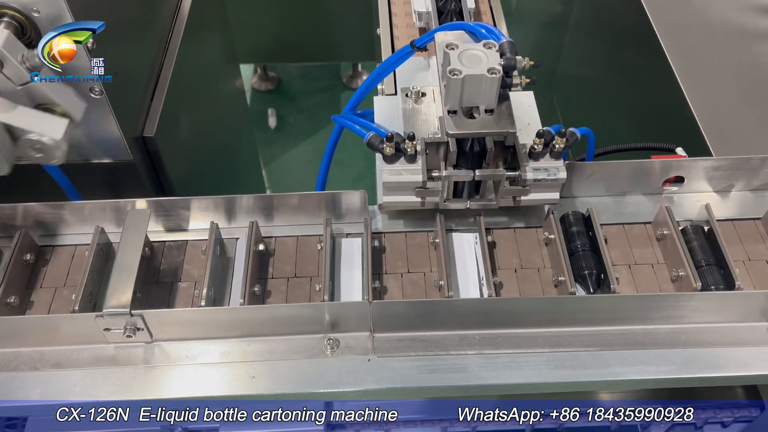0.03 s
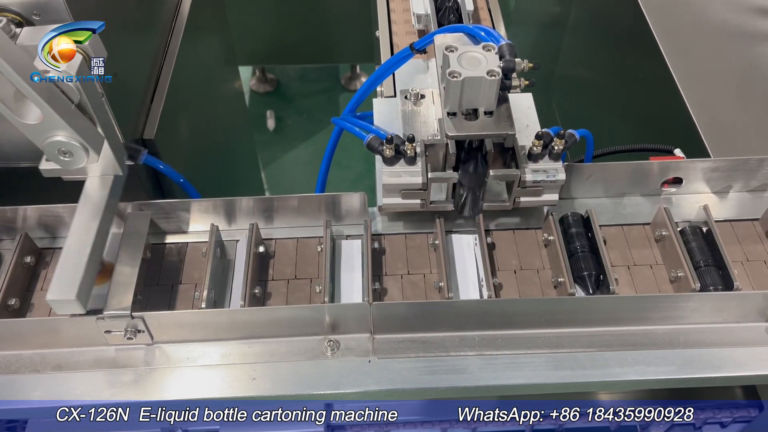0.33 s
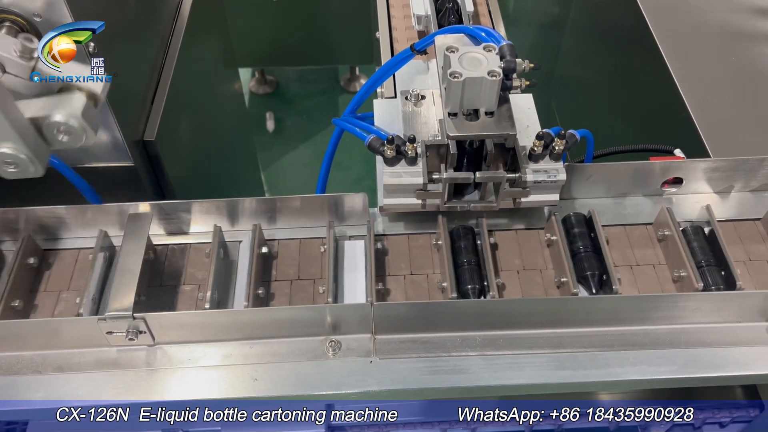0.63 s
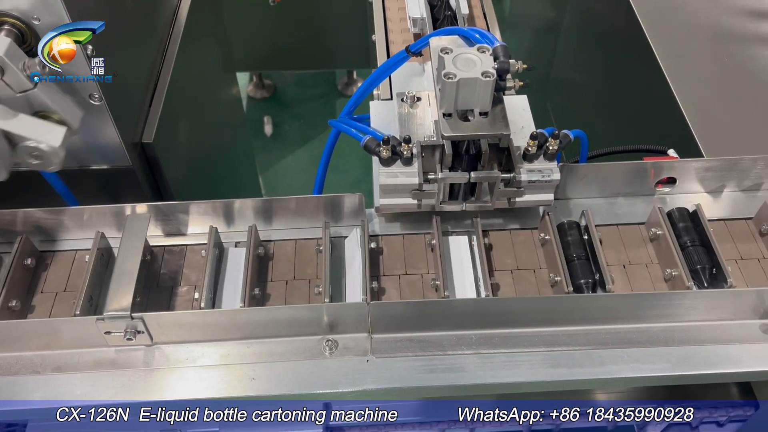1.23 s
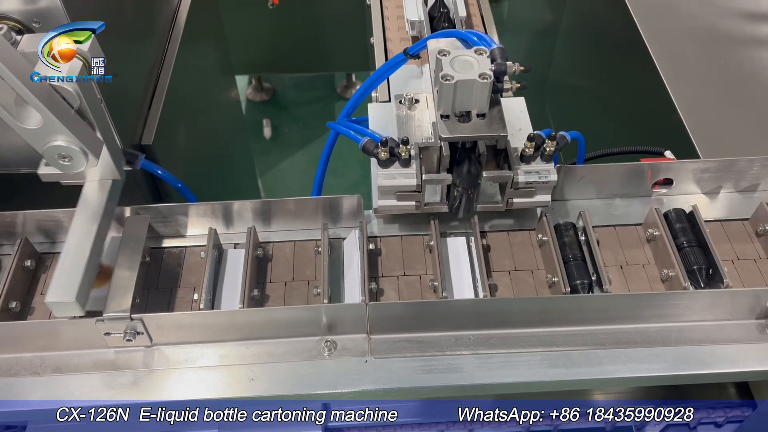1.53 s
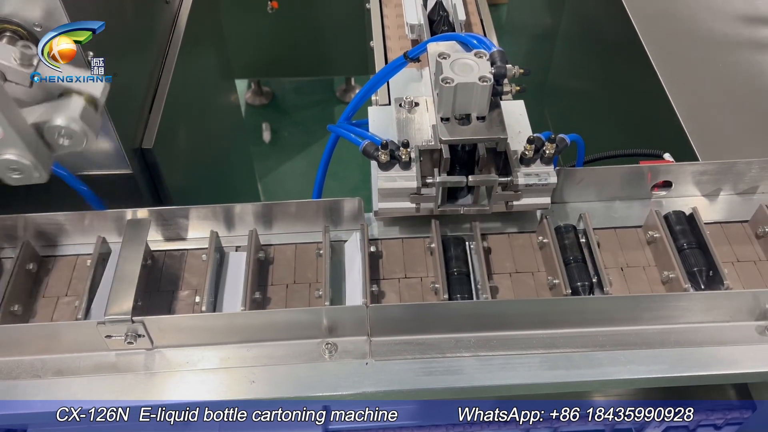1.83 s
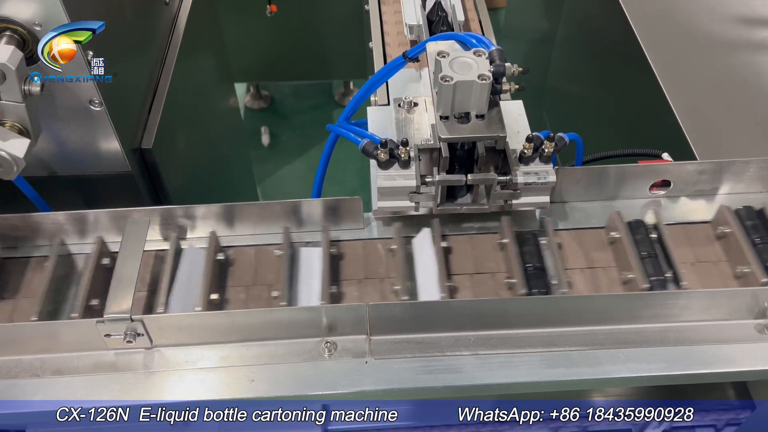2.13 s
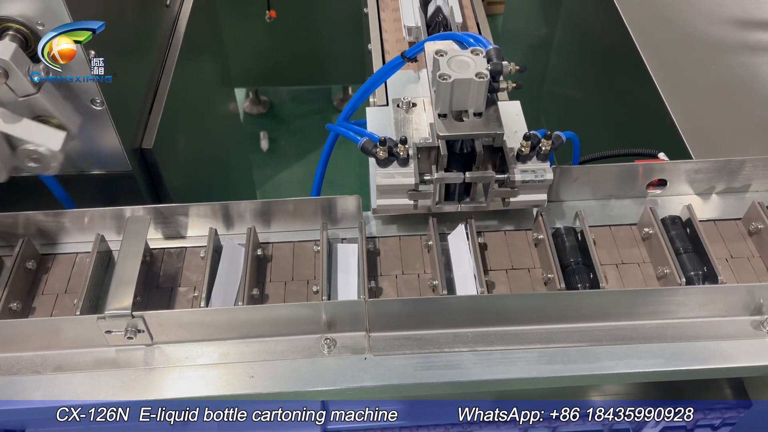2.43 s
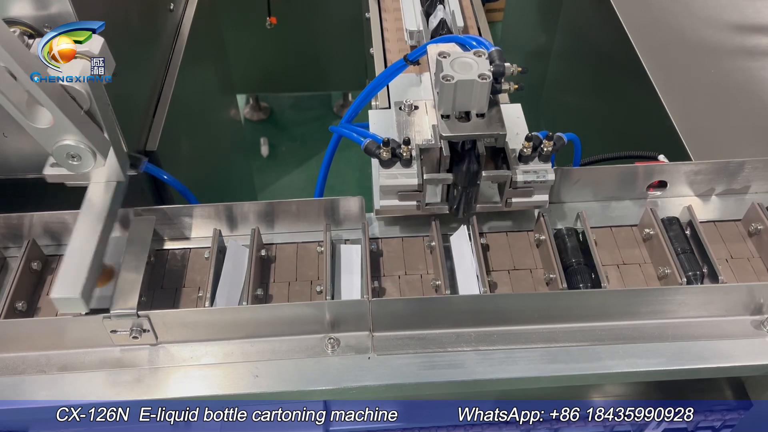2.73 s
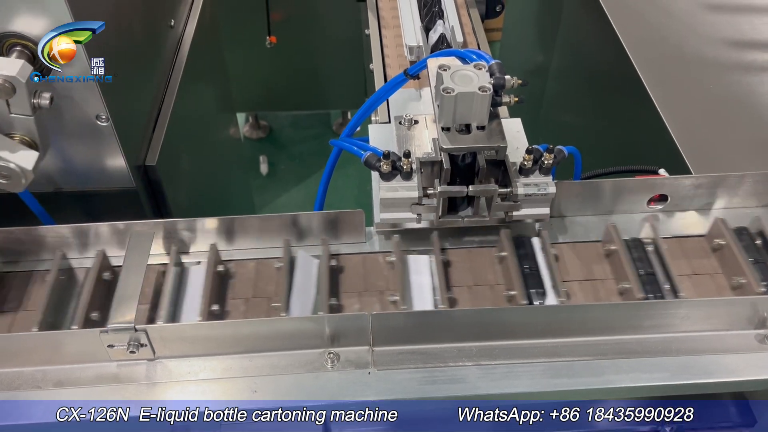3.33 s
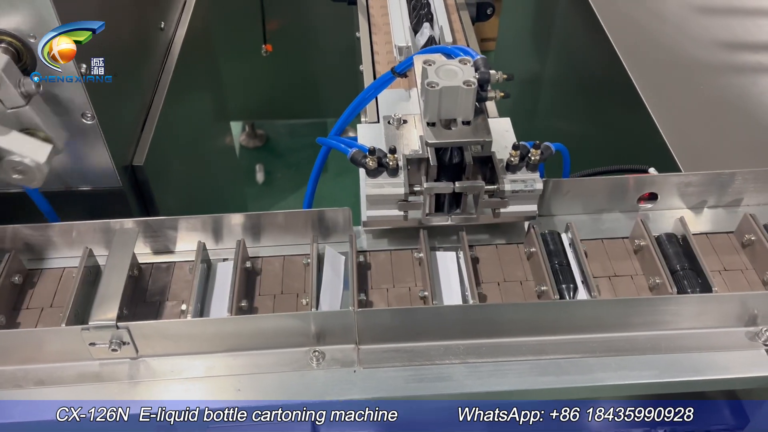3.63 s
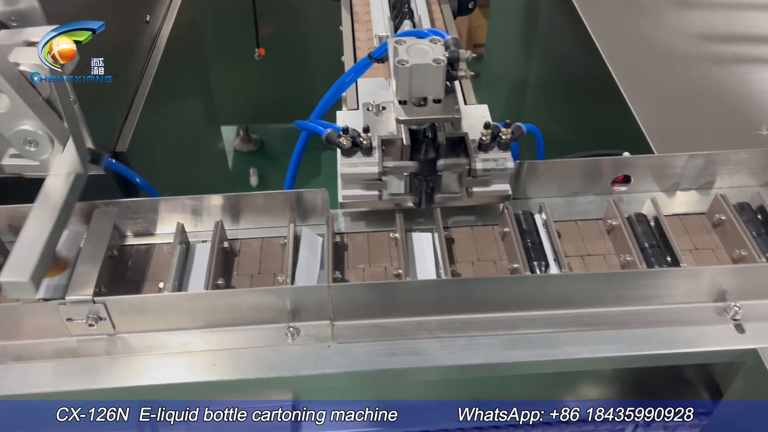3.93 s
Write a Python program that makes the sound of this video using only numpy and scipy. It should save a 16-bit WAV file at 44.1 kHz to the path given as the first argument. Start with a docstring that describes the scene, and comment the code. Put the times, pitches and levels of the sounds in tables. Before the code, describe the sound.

An automatic packaging machine cycles steadily in a factory hall. Its arm knocks on sheet steel, a gripper snaps, valves puff air, and a chain conveyor slides and thumps to a stop. Near the end the chain briefly judders.

```python
"""A cartoning machine runs in a factory hall, one cycle about every 1.2 seconds.
Its arm knocks cartons into place and rings the sheet steel, a gripper snaps, and valves puff air.
The chain slides on one pocket and stops with a thump; cartons rub along the guides.
Near the end a bottle catches and the chain judders. Drives rumble and hum underneath."""
import sys
import numpy as np
from scipy import signal
from scipy.fft import rfft, irfft
from scipy.io import wavfile

SR = 44100
rng = np.random.default_rng(int(sys.argv[2]) if len(sys.argv) > 2 else 0)


def generate_wav(sig):
    """Save sig (samples, or channels by samples) to the path in sys.argv[1] as 16-bit PCM at SR."""
    pcm = np.round(np.clip(np.atleast_2d(sig).T, -1, 1) * 32767).astype(np.int16)
    wavfile.write(sys.argv[1], SR, pcm)


N = 176400
T = np.arange(N) / SR
CYCLE_S = 1.209


def arm():
    """The arm and pushers knock on sheet steel: a hollow clatter, a ring and a deep panel boom."""
    # Each row: start in seconds, clatter, ring and boom in dB, rise and fade in seconds.
    knocks = [(0.319, -22, -31, -18.5, 0.002, 0.13), (0.334, -27, -38, -25, 0.0025, .09),
              (0.583, -26, -31, -36, 0.0095, 0.1), (0.612, -18, -24.5, -21, 0.00075, 0.048),
              (1.153, -25, -40, -32, .003, 0.12), (1.527, -26, -30, -31, 0.0027, 0.06),
              (1.544, -29, -29.5, -24.5, 0.0028, 0.12), (1.787, -24.5, -30.5, -37, 0.0032, 0.17),
              (1.821, -16, -23.5, -21.5, 0.0014, 0.018), (2.362, -32, -43, -26.5, 0.0065, 0.077),
              (2.738, -17, -23.5, -15, 0.00487, 0.044), (2.755, -34, -35, -23, 0.0019, 0.05),
              (3.031, -25, -29, -24, 0.0018, 0.13), (3.576, -25.5, -34.5, -24.5, 0.0039, 0.12),
              (3.946, -27, -41, -33, 0.0026, 0.12), (3.963, -25, -32, -21, 0.0029, 0.079)]
    # Each row is one ringing tone: pitch in Hz, level in dB, fade in seconds.
    steel_modes = [(980, -13, 0.03), (1060, -6, 0.047), (1273, -4.5, 0.05), (1338, -2, 0.07),
                   (1525, -10, 0.062), (1804, -6.5, 0.058), (2090, -3, 0.035), (2480, -15, 0.043)]
    panel_modes = [(260, -5.5, 0.16), (471, -2.5, 0.098), (544, -9, 0.08), (696, 0, 0.042),
                   (758, -7.5, 0.058)]
    # The clatter's tone. Each row: frequency in Hz, level in dB.
    colour = [(100, -28), (250, 11.5), (480, 0.5), (720, -10), (1000, 6.5), (1400, -3), (2400, -11.5),
              (4000, -11.5), (8000, -54)]
    clatter = sum(from_db(db) * envelope(s, rise, t60) for s, db, _, _, rise, t60 in knocks)
    contacts = bouncing([(s, db) for s, _, db, _, _, _ in knocks], gap_s=0.0046, loss_db=3, count=3)
    boom = struck([(s + rise, db) for s, _, _, db, rise, _ in knocks], panel_modes, spread_db=1)
    return clatter * noise(colour, flicker_db=3.5) + struck(contacts, steel_modes, spread_db=5) + boom


def clicks():
    """The gripper snaps, the arm's tip taps a carton, end stops tick: each clacks and briefly rings."""
    # Each row: start in seconds, clack, bright edge and ring in dB, fade in seconds.
    snaps = [(0.5156, -13, -28, -20, 0.012), (0.5192, -10.5, -17, -25, 0.016),
             (1.7266, -11.5, -11.5, -12.5, 0.015), (2.9411, -17, -9.5, -10, 0.011)]
    taps = [(0.3145, -26, -34, -17, 0.011), (1.5239, -8.5, -11, -15, 0.0079), (1.8215, -24, -34, -23, .02),
            (2.7342, -9, -30, -15.5, .008), (3.9448, -21, -7, -11.5, 0.012)]
    ticks = [(1.1468, -25, -10, -33, 0.0065), (2.3625, -20, -12.5, -26, 0.012),
             (2.4420, -14, -20, -36, 0.021), (3.0732, -14, -24, -17, 0.013),
             (3.6622, -15.5, -31, -18.5, 0.021)]
    # How each part rings. Each row: pitch in Hz, level in dB, fade in seconds.
    gripper_modes = [(930, -5.5, 0.015), (2000, -15.5, 0.024), (3290, 1.5, 0.015), (4840, -6, 0.018),
                     (11100, -6, 0.0055)]
    arm_modes = [(2220, -5.5, 0.016), (2400, -2, 0.013), (3020, -10.5, 0.0054), (4880, -5, 0.012)]
    stop_modes = [(5320, 1, 0.016)]
    # Each row: frequency in Hz, level in dB.
    clack_colour = [(300, -6), (900, 3), (2200, 6.5), (3400, 5), (5000, 3), (7000, -1), (10000, -17),
                    (16000, 3.5)]
    edge_colour = [(4000, -0.5), (8000, -4), (10000, 1.5), (12000, 7), (15000, 3), (16500, -13)]
    clack = edge = ring = 0
    for hits, modes in (snaps, gripper_modes), (taps, arm_modes), (ticks, stop_modes):
        ring += struck([(s, db) for s, _, _, db, _ in hits], modes, spread_db=3.5)
        for s, clack_db, edge_db, _, t60 in hits:
            burst = envelope(s, 0.00014, t60)
            clack += from_db(clack_db) * burst
            edge += from_db(edge_db) * burst
    return clack * noise(clack_colour, flicker_db=.5) + edge * noise(edge_colour, flicker_db=.5) + ring


def frame():
    """Each start or stop swings the frame at a low pitch and sets its panels rumbling."""
    # Each row: seconds into the cycle, swing in dB, pitch in Hz, rumble in dB, rise and fade in seconds.
    thumps = [(0.289, -17.5, 233, -27.5, 0.0035, 0.066), (0.322, -32.5, 283.5, -27, 0.019, 0.49),
              (0.61, -36, 285, -27.5, 0.0026, 0.28), (0.925, -17, 92, -23.5, .013, 0.15),
              (1.113, -19.5, 143.8, -24, 0.0037, 0.1), (0.02, -38, 80, -25, 0.011, 0.26)]
    # The rumble's tone. Each row: frequency in Hz, level in dB.
    colour = [(30, -29), (60, 4.5), (110, -4.5), (190, -7.5), (280, 1), (400, -8.5), (700, -11.5),
              (2000, -38)]
    swing = rumble = 0
    for s, swing_db, hz, rumble_db, rise, t60 in thumps:
        for start in every_cycle(s):
            jolt = envelope(start, rise, t60)
            swing += from_db(swing_db) * jolt * np.sin(2 * np.pi * hz * (T - start))
            rumble += from_db(rumble_db) * jolt
    return swing + rumble * noise(colour, flicker_db=1.5)


def valves(open_s=.3):
    """Escaping air hisses over a lower rush and whistles at the nozzle until the valve shuts."""
    # Each row: seconds into the cycle, hiss, rush and whistle in dB, rise, hold and fade in seconds.
    puffs = [(0.008, -31, -34.5, -33.5, .025, 0.013, 2.1), (0.284, -24.5, -25, -37, 0.017, 0.017, 0.28),
             (0.325, -33, -35, -39.5, 0.034, 0.031, 2.2), (1.091, -27, -33, -49, 0.029, 0.032, 0.18)]
    # Each row: frequency in Hz, level in dB.
    hiss_colour = [(3000, -30), (6000, -8), (7300, -0.5), (8100, 0), (9300, 1.5), (10900, -6.5),
                   (12300, 2.5), (13600, -0.5), (15600, -3.5)]
    rush_colour = [(300, 7), (900, -1), (1800, 1.5), (3000, 6.5), (4500, 3.5), (6000, 5), (8000, -2),
                   (12000, -8)]
    whistle_colour = [(9000, -25), (10300, -7), (10950, -3.5), (11500, -8), (12200, -22)]
    hiss = rush = whistle = 0
    for s, hiss_db, rush_db, whistle_db, rise, hold, t60 in puffs:
        flow = sum(envelope(start, rise, t60, hold) * (T < start + open_s) for start in every_cycle(s))
        hiss = np.hypot(hiss, from_db(hiss_db) * flow)  # overlapping puffs add in power
        rush = np.hypot(rush, from_db(rush_db) * flow)
        whistle += from_db(whistle_db) * flow
    return (hiss * noise(hiss_colour, flicker_db=1.1)
            + whistle * noise(whistle_colour, flicker_db=2)
            + panned(rush * noise(rush_colour, flicker_db=2.15), left_db=1.5))


def chain(hiss_boost_db=3.5, scrape_boost_db=1, ticks_per_s=250, tick_db=-8.5):
    """The chain hisses and scrapes along its guides while the links tick."""
    # One list per advance. Each row: time in seconds, hiss and scrape in dB before their boosts.
    slides = [
        [(0.56, -51, -47), (0.566, -52, -51), (0.58, -33.5, -29), (0.704, -29, -33), (0.77, -33, -29.5),
         (0.808, -45, -55), (0.826, -32.5, -35), (0.872, -51, -53), (0.916, -45, -47), (0.948, -32, -32.5),
         (1.06, -34.5, -32.5), (1.09, -52, -37)],
        [(1.77, -37, -54), (1.82, -30, -27.5), (1.844, -31, -33), (1.87, -28.5, -32), (2.084, -28, -32.5),
         (2.134, -31, -35), (2.152, -28.5, -30), (2.19, -40, -58), (2.196, -52, -59), (2.25, -37.5, -48),
         (2.286, -36, -52), (2.3, -52, -40)],
        [(2.98, -48, -50), (2.994, -50, -39), (3.012, -31, -26.5), (3.026, -36, -29), (3.042, -39, -30),
         (3.062, -34, -31), (3.08, -33, -23.5), (3.114, -32, -30.5), (3.312, -30.5, -34), (3.43, -33.5, -34.5),
         (3.51, -35, -55)],
    ]
    # Each row: frequency in Hz, level in dB.
    hiss_colour = [(3000, -33), (6000, -10), (7300, -3.5), (8100, -13), (9300, -1.5), (10900, -3.5),
                   (12300, -1.5), (13600, -0.5), (15600, -3)]
    scrape_colour = [(400, 7.5), (1000, -5), (1800, -0.5), (2700, 0), (3900, 2), (5200, -4), (7200, -6.5),
                     (12000, -44)]
    hiss_level = scrape_level = 0
    for advance in slides:
        s, hiss_db, scrape_db = np.transpose(advance)
        hiss_level += np.interp(T, s, from_db(hiss_db + hiss_boost_db), 0, 0)
        scrape_level += np.interp(T, s, from_db(scrape_db + scrape_boost_db), 0, 0)
    ticks = (rng.random(N) < ticks_per_s / SR) * rng.standard_normal((2, N))
    hiss = noise(hiss_colour, flicker_db=1.5)
    scrape = noise(scrape_colour, flicker_db=2) + from_db(tick_db) * coloured(ticks, scrape_colour)
    return hiss_level * hiss + panned(scrape_level * scrape, left_db=1.5)


def rattle():
    """As the chain halts, its slack links jangle against each other."""
    # Each row: start in seconds, level in dB.
    halts = [(0.9505, -23.5), (2.152, -37), (3.3605, -23.5)]
    # How the links ring. Each row: pitch in Hz, level in dB, fade in seconds.
    link_modes = [(2820, -11, 0.011), (3650, 3.5, 0.014), (4180, -3, 0.0088), (4930, -4, .01)]
    return struck(bouncing(halts, gap_s=.003, loss_db=2.8, count=8), link_modes, spread_db=3.5)


def bottle(rise=0.00069, t60=0.012):
    """A bottle catches in its pocket with short gritty scuffs."""
    # Each row: start in seconds, level in dB, hold in seconds.
    scuffs = [(3.006, -16.5, .0035), (3.028, -13.5, .0022), (3.067, -17, .001), (3.0706, -13.5, 0.0038)]
    # The scuffs' tone. Each row: frequency in Hz, level in dB.
    colour = [(400, -4), (1200, 0), (3000, -3), (4600, 0.5), (6200, 1.5), (8000, 3), (10000, 2),
              (13000, -7), (16000, -2)]
    level = sum(from_db(db) * envelope(s, rise, t60, hold) for s, db, hold in scuffs)
    return panned(level * noise(colour, flicker_db=1), left_db=-1.3)


def judder(start=3.07, rise=0.018, hold=0.49, t60=0.66, db=-31):
    """After the bottle has caught, the chain runs roughly for one advance."""
    # A low growl. Each row: frequency in Hz, level in dB.
    colour = [(80, -23), (160, -2), (300, 3.5), (420, -6.5), (900, -24)]
    return from_db(db) * envelope(start, rise, t60, hold) * noise(colour, flicker_db=4.5)


def guard(at_s=1.155, db=-27, hz=1335, t60=0.13):
    """Once a cycle the returning pusher sets a thin guard plate ringing."""
    return struck([(start, db) for start in every_cycle(at_s)], [(hz, 0, t60)], spread_db=1)


def cartons(patchy_db=3):
    """Cartons grip and slip on the guides; each rub swells and fades around one pitch."""
    # Each row: start and length in seconds, pitch and band width in Hz, level in dB.
    rubs = [(0.733, 0.042, 2700, 180, -36), (0.745, .04, 3800, 400, -35), (0.938, 0.042, 4040, 300, -34),
            (1.91, 0.15, 2600, 160, -42), (1.058, 0.14, 2830, 330, -38), (1.277, 0.2, 2930, 380, -37.5),
            (1.73, 0.4, 2910, 252, -39), (1.854, 0.15, 3880, 260, -37), (2.04, 0.14, 11700, 300, -34),
            (3.077, 0.32, 11950, 447, -36)]
    out = 0
    for s, length, hz, width_hz, db in rubs:
        band = signal.butter(2, [hz - width_hz / 2, hz + width_hz / 2], "band", fs=SR, output="sos")
        progress = np.clip((T - s) / length, 0, 1)
        swell = np.sqrt(np.abs(np.sin(np.pi * progress)))
        out += from_db(db) * swell * rms_one(signal.sosfilt(band, rng.standard_normal(N)))
    return out * rms_one(from_db(patchy_db * drift(21)))


def hall(rumble_db=-27):
    """The hall rumbles and the drives give a wavering hum."""
    # The drives' tones. Each row: pitch in Hz, level in dB.
    hums = [(64.8, -41.5), (205, -49.5), (1049, -49.5), (5878, -60)]
    # The rumble's tone. Each row: frequency in Hz, level in dB.
    colour = [(22, -42), (33, -42), (45, 2), (62, -1.5), (110, 1.5), (160, -1.5), (270, -3), (400, -9),
              (620, -9.5), (850, -13), (1200, -12), (1800, -19.5), (3000, -19.5), (5500, -25), (8300, -27),
              (10800, -28), (14000, -26.5), (16000, -24.5)]
    hum = 0
    for hz, db in hums:
        waver = 0.39 * drift(2.75)
        hum += from_db(db) * np.sqrt(2) * np.sin(2 * np.pi * hz * T + waver)
    return from_db(rumble_db) * noise(colour, flicker_db=1) + hum


def walls(x):
    """Steel walls close by add quick echoes above the bass."""
    # Each row: delay in seconds, strength (a minus flips the wave).
    echoes = [(.0031, -0.013), (.0053, .1), (.0083, -0.13)]
    upper = signal.sosfilt(signal.butter(1, 900, "high", fs=SR, output="sos"), x)
    return x + sum(gain * np.pad(upper, ((0, 0), (int(s * SR), 0)))[:, :N] for s, gain in echoes)


def room(x, t60, wet_db):
    """The hall's many echoes blur into a short tail."""
    echoes = rng.standard_normal((2, N)) * envelope(start=0.0043, rise=0.0036, t60=t60)
    tail = coloured(echoes, [(2000, 1), (12000, 0.5)]) / np.sqrt(N)
    return x + from_db(wet_db) * signal.fftconvolve(x, tail, axes=1)[:, :N]


def struck(hits, modes, spread_db):
    """Hits (seconds, dB) ring a part's tones, with a random strength for each hit, tone and ear."""
    s, db = np.transpose(hits)
    out = np.zeros((2, N))
    for hz, mode_db, t60 in modes:
        scatter_db = spread_db * rng.standard_normal((len(s), 2)).T
        kicks = np.full((2, N), 1e-18)
        kicks[:, (s * SR).astype(int)] = from_db(db + mode_db + scatter_db)
        decay, step = np.exp(-np.log(1000) / (t60 * SR)), 2 * np.pi * hz / SR
        ring = signal.lfilter([0, np.sin(step)], [1, -2 * decay * np.cos(step), decay ** 2], kicks)
        out += rng.choice([-1, 1]) * ring
    return out


def bouncing(hits, gap_s, loss_db, count):
    """Each hit (seconds, dB) is followed by weaker bounces at uneven gaps."""
    gaps = gap_s * (.5 + rng.random((len(hits), count)))
    return [(min(s + gap[:k].sum(), T[-1]), db - k * loss_db)
            for (s, db), gap in zip(hits, gaps) for k in range(count)]


def envelope(start, rise, t60, hold=0):
    """A level that rises, holds, then fades by 60 dB in t60 seconds."""
    out = np.zeros(N)
    live = slice(*np.searchsorted(T, [start, start + rise + hold + 2 * t60]))
    t = T[live] - start
    out[live] = np.clip(t / rise, 0, 1) * np.exp(-np.log(1000) * np.maximum(t - rise - hold, 0) / t60)
    return out


def every_cycle(s):
    """The times at which one point of the cycle comes round."""
    return np.arange(s, N / SR, CYCLE_S)


def noise(colour, flicker_db):
    """Stereo noise whose level flickers."""
    steady = coloured(rng.standard_normal((2, N)), colour)
    return rms_one(steady * from_db(flicker_db * drift(29)))


def coloured(pair, colour):
    """Blend two signals into stereo; the colour sets the balance of low and high, not the loudness."""
    # Each row: frequency in Hz, how alike left and right are from 0 to 1.
    likeness = [(60, 0.99), (300, 0.83), (500, 0.34), (800, 0.013), (1500, 0.011), (1900, 0.74),
                (3000, 0.52), (4500, 0.5), (5400, 0.12), (7000, 0.91), (8300, 1), (9800, 0.86),
                (12000, 0.87), (13800, 0.92), (15500, .99)]
    hz = np.arange(N // 2 + 1) * SR / N
    alike = np.clip(at_hz(likeness, hz), -.995, .995)
    mid, side = rfft(pair) * from_db(at_hz(colour, hz)) * np.sqrt([1 + alike, 1 - alike])
    return rms_one(irfft(np.array([mid + side, mid - side]), N))


def drift(rate_hz):
    """A smooth random wander, about 1 in size."""
    stride, warm_up = 40, 2000
    pole = np.exp(-2 * np.pi * rate_hz * stride / SR)
    jitter = rng.standard_normal(N // stride + warm_up + 2)
    slow = signal.lfilter([1], [1, -2 * pole, pole ** 2], jitter)[warm_up:]
    return np.interp(np.arange(N) / stride, np.arange(len(slow)), rms_one(slow))


def panned(x, left_db):
    """Lean a sound to the left, or to the right if left_db is negative."""
    return x * from_db([[left_db / 2], [-left_db / 2]])


def at_hz(points, hz):
    """Read between a table's rows on a log-frequency scale."""
    row_hz, value = np.transpose(points)
    return np.interp(np.log(hz + 1), np.log(row_hz), value)


def from_db(db):
    """Turn decibels into a gain."""
    return 10 ** (np.asarray(db) / 20)


def rms_one(x):
    """Scale to an average power of 1."""
    return x / np.sqrt(np.mean(x ** 2) + 1e-20)


def scene():
    """All parts of the machine in the hall."""
    running = walls(hall() + valves() + chain() + cartons()) + frame() + judder()
    impacts = arm() + guard() + clicks() + rattle() + bottle()
    return running + room(impacts, t60=0.18, wet_db=-11.5)


def record(dry, cutoff_hz=15800):
    """Left and right hear the treble out of step; peaks are rounded and the very top is cut."""
    # Each row: frequency in Hz, how far the right side leads in radians.
    right_lead = [(100, 0), (500, .3), (1800, 0), (3500, -.7), (5000, -.7), (5600, .9), (7100, 1.4),
                  (7800, 3.05), (8700, 3.2), (9500, 4.3), (11300, 6.1), (12400, 6.4), (13700, 7.7),
                  (15300, 9.4)]
    phase = at_hz(right_lead, np.arange(N + 1) * SR / (2 * N))
    shift = np.exp(.5j * phase * np.array([[-1], [1]]))
    shifted = irfft(rfft(dry, 2 * N) * shift)[:, :N]
    rounded = 2 * np.tanh(shifted / 2)
    return signal.sosfilt(signal.ellip(10, .1, 80, cutoff_hz, fs=SR, output="sos"), rounded)


dry = scene()
out = record(dry)
generate_wav(out)
```